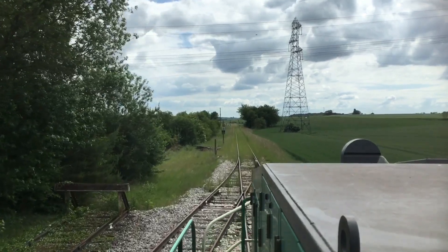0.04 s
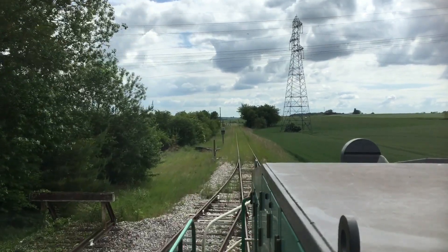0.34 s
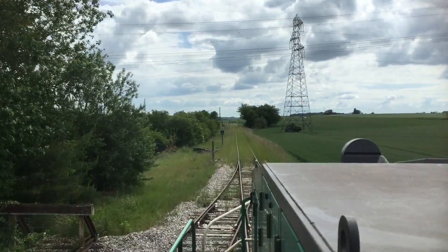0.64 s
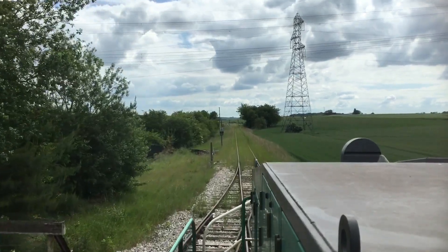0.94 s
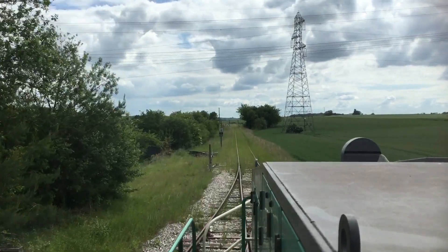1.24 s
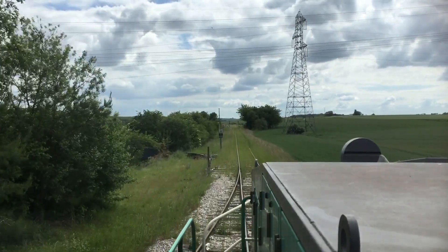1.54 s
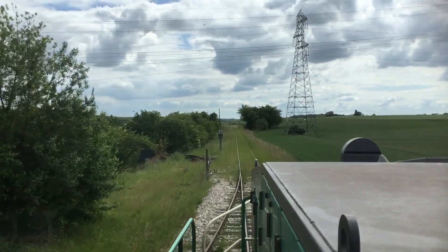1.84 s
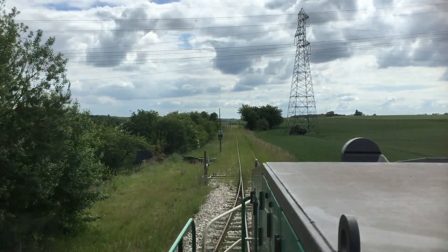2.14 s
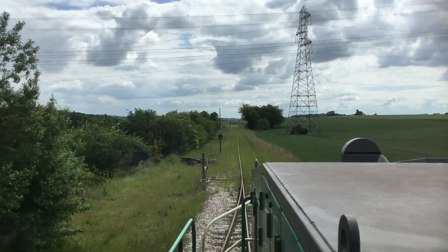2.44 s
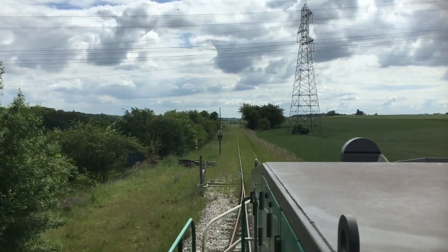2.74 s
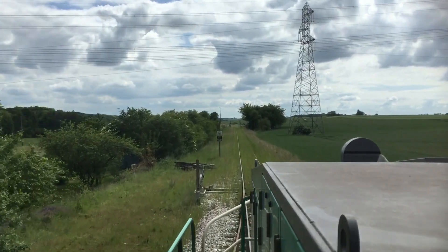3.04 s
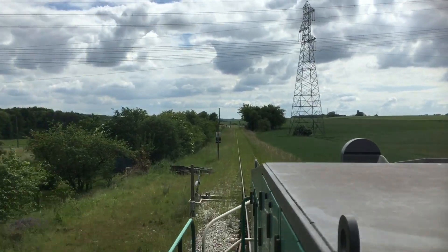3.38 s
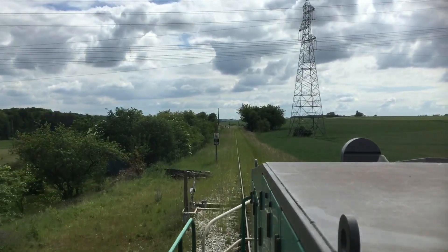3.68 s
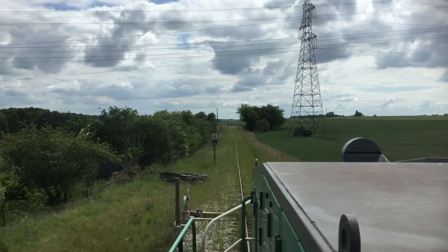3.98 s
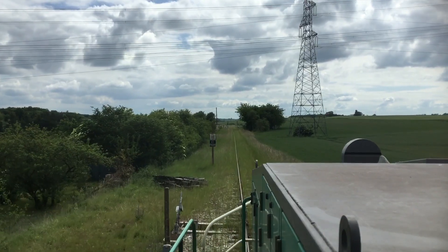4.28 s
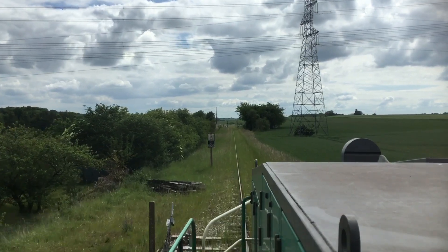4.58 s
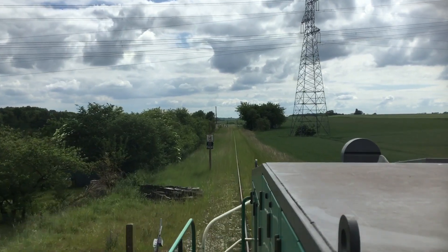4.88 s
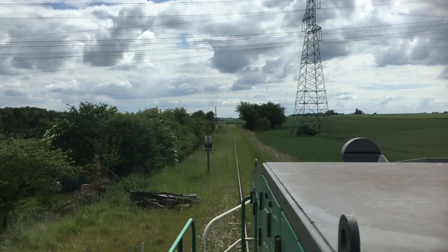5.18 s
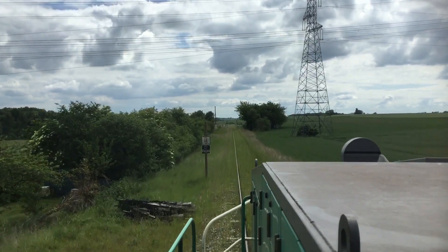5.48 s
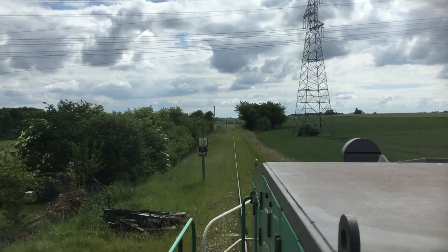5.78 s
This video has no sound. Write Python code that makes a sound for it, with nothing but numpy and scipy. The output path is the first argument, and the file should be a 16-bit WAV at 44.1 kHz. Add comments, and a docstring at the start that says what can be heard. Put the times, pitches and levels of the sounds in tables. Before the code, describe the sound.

A diesel locomotive engine drones low and steady for about six seconds, heard from inside the cab over a deep rumble and faint hiss. It throbs most noticeably in the first second, and a boomy hum swells and fades. Throughout, a loose metal panel rattles in short, bright, irregular clanks, several a second, with a tight echo from the steel walls. A faint wheel squeak comes near 0.9 seconds, and a few more brief, faint squeals between 2.3 and 4.8 seconds. From 2.8 to 3.1 seconds the wheels knock over the track in a cluster of dull, crunchy thumps, with faint gritty scrapes until 3.4 and softer single knocks until 4.2. The clanking thins out around 3.5 seconds, then is strongest from 4.4 to 5.2. From about 5.1 seconds the engine speeds up slightly and grows a little stronger.

```python
"""An eight-cylinder diesel engine drones in the cab of a locomotive pulling slowly away. Its harmonics
add in phase once a cycle, making a throb; two of them boom near air modes of the cab, and near the end
the engine is opened up. Its shaking makes a loose metal panel clank, and the steel walls reflect the crash.
A flange squeals faintly by stick and slip, grit scrapes under the frame and the wheels knock over
the track, all above the rumble of the cab and the hiss of machinery and rails."""
import sys
import numpy as np
from scipy import signal
from scipy.fft import rfft, irfft
from scipy.io import wavfile
from scipy.ndimage import uniform_filter1d

SR = 44100
rng = np.random.default_rng(int(sys.argv[2]) if len(sys.argv) > 2 else 0)


def put_to_file(sound):
    """Save the sound as 16-bit audio at rate SR, in the file named by the first command-line argument."""
    columns = np.atleast_2d(sound).T  # one column per channel
    safe = np.clip(columns, -1, 1)
    whole_steps = np.round(safe * 32767)
    wavfile.write(sys.argv[1], SR, whole_steps.astype(np.int16))


N = 256662
T = np.arange(N) / SR
FREQ = np.maximum(np.arange(N // 2 + 1) * SR / N, 1)
CYLINDERS = 8

# engine speed: (time [s], firing rate [Hz])
FIRING_RATE = [(0, 77.5), (0.3, 77.3), (1.2, 76.85), (2, 76.54), (2.7, 76.46), (3.3, 76.61), (4.2, 76.63),
               (5.1, 76.7), (5.5, 77.6), (5.82, 79.55)]
# engine load, as the strength of the harmonic at the firing rate: (time [s], level [dB])
ENGINE_LOAD = [(0.0, -19), (1.85, -18), (3.58, -18.5), (4.96, -18.5), (5.48, -16), (5.82, -16)]
# harmonics of the drone: (order [multiple of the cycle rate], level [dB])
ENGINE_ORDERS = [(6, -41), (7, -54), (8, -17), (9, -30.5), (10, -29.5), (11, -59), (12, -55), (13, -35),
                 (14, -41.5), (18, -46), (22, -47.5), (29, -47), (37, -56), (54, -60.5), (62, -63)]
# modulation of the drone once a cycle, deepest at the start: (time [s], depth [0-1])
THROB_DEPTH = [(0, 0.13), (.9, .04), (5.82, .02)]
# strength of the order that booms in the cab: (time [s], level [dB])
BOOM_LEVEL = [(0, -37), (.66, -34), (1.5, -34.5), (2.6, -38.5), (2.9, -40.5), (3.55, -32), (4.7, -52),
              (4.96, -29.5), (5.45, -47.5), (5.82, -58)]
# spectrum of the cab's rumble: (frequency [Hz], relative density [dB])
RUMBLE_SPECTRUM = [(20, -23.5), (40, -12), (58, -3.5), (95, -2), (140, 0), (195, 1), (240, -3.5), (285, -6),
                   (350, -9.5), (430, -23.5), (580, -31.5), (1100, -53.5), (2500, -79.5)]
# strength of the rumble: (time [s], level [dB])
RUMBLE_LEVEL = [(0, -34.5), (.7, -30), (1.4, -31), (2.3, -33.5), (2.9, -29), (3.6, -30), (4.4, -30.5),
                (5, -28.5), (5.4, -32.5), (5.82, -35.5)]
# spectrum of the hiss of machinery and rails: (frequency [Hz], relative density [dB])
HISS_SPECTRUM = [(500, -5), (1000, 0.5), (1500, -2), (2500, -6), (4000, -11), (5000, -20), (7000, -24.5),
                 (10000, -35), (15500, -37.5)]
# strength of the hiss: (time [s], level [dB])
HISS_ENVELOPE = [(0, -59), (1, -57.5), (1.95, -60), (2.7, -56.5), (3.3, -56), (3.8, -60), (4.8, -56),
                 (5.82, -58)]
# hard blows of the loose panel: (time [s], relative level [dB])
PANEL_CLANKS = [(0.0703, -40.5), (0.1715, -32.5), (0.2784, -39.5), (0.4191, -32.5), (0.5924, -35.5),
                (0.733, -32), (0.8313, -33), (0.9261, -35), (1.1484, -46.5), (1.2082, -45), (1.2682, -37.5),
                (1.4544, -34), (1.48, -35.5), (1.5541, -32), (1.6546, -33.5), (1.73, -32.5),
                (2.0086, -39.5), (2.0355, -37), (2.1137, -32), (2.2166, -30.5), (2.3044, -35), (2.395, -34),
                (2.4942, -30), (2.5883, -37), (2.7735, -39.5), (2.8788, -35.5), (2.9667, -34.5),
                (3.0624, -35.5), (3.1482, -44.5), (3.1624, -36), (3.2534, -38.5), (3.4477, -38),
                (3.628, -45), (3.7312, -40.5), (3.8287, -42), (4.1064, -40), (4.1279, -34.5),
                (4.2086, -35.5), (4.2717, -36), (4.3378, -38.5), (4.4449, -31.5), (4.5203, -31.5),
                (4.5454, -34), (4.6218, -29), (4.6464, -32.5), (4.7206, -27.5), (4.814, -34),
                (4.8982, -27.5), (4.9985, -28), (5.0749, -33.5), (5.0966, -33), (5.1784, -31),
                (5.2544, -37.5), (5.285, -31), (5.3833, -33.5), (5.4595, -32), (5.5588, -34), (5.7346, -36)]
# main modes of the panel: (frequency [Hz], width [Hz], relative density [dB])
PANEL_MODES = [(1487, 39, 3.5), (1707, 9.4, -0.5), (1860, 23, -25), (2325, 61, 3.5), (2730, 23, -4.5),
               (2830, 12, -1.5), (3480, 18, -18.5), (3430, 58, -3.5), (3735, 110, -4.5), (3870, 10, -1.5),
               (4365, 12, -4), (4356, 21, -20), (4770, 12, -14.5), (5530, 12, -8.5), (5420, 27, -3),
               (5800, 30, -1), (6183, 65, 2), (6640, 49, -28.5), (7150, 83, -11), (7880, 25, -2.5),
               (8400, 37, -17.5), (9020, 22, -13.5), (9330, 60, -17.5), (10670, 39, -19)]
# crash of the panel's many weak modes: (frequency [Hz], relative density [dB])
CRASH_SPECTRUM = [(700, -28.5), (1300, -5.5), (1550, -9.5), (2600, 1.5), (3100, -1.5), (4000, 1.5),
                  (6100, -3), (6700, -6), (8200, -9), (10000, -27), (11000, -21.5), (13300, -24.5)]
# flange rubbing on the rail:
# (time [s], length [s], start pitch [Hz], end pitch [Hz], level [dB], roughness [1 or more is all noise])
FLANGE_SQUEALS = [(0.891, 0.059, 555, 532, -40, .3), (2.349, 0.26, 4180, 4040, -54.5, 0.95),
                  (2.98, 0.099, 2150, 1880, -55, 0.8), (3.207, 0.076, 654, 510, -35, 0.2),
                  (3.283, 0.13, 2450, 2770, -55.5, 0.9), (3.495, 0.28, 4300, 3930, -57.5, 1.1),
                  (4.561, 0.21, 4400, 4120, -53, 0.9)]
# gritty scrapes under the frame: (peak time [s], half width [s], level [dB])
FRAME_SCRAPES = [(1.04, 0.046, -64.5), (2.9, 0.06, -55), (3.04, 0.042, -54.5), (3.2, 0.042, -55.5),
                 (3.38, 0.046, -56.5)]
# knocks of wheels and frame: (time [s], length [s], boom level [dB], pitch [Hz], crunch level [dB])
WHEEL_KNOCKS = [(2.821, 0.065, -16.5, 274.6, -34), (2.876, 0.033, -22, 285, -42),
                (2.972, 0.051, -32.5, 337, -31), (3.025, 0.012, -17.5, 284, -31),
                (3.026, .036, -39.5, 705, -27.5), (3.395, 0.06, -28.5, 276.6, -39),
                (3.691, 0.042, -26, 285, -40), (4.045, 0.034, -24, 278, -35.5),
                (4.165, 0.042, -27, 278, -55), (5.562, 0.0072, -41, 1130, -29)]


def undb(db):
    """Decibels to amplitude gain."""
    return 10 ** (np.asarray(db) / 20)


def unit(x):
    """Scale to rms 1."""
    return x / np.sqrt(np.mean(x ** 2))


def curve(rows):
    """Linear interpolation of (time [s], value) rows at every sample."""
    return np.interp(T, *np.transpose(rows))


def noise(gain):
    """Gaussian noise of rms 1, shaped by a gain at each frequency."""
    return unit(irfft(rfft(rng.standard_normal(N)) * gain, N))


def coloured_noise(spectrum):
    """Noise of rms 1 shaped by (frequency [Hz], density [dB]) rows, falling away below the first."""
    hz, db = np.transpose(spectrum)
    low_cut = np.minimum(FREQ / hz[0], 1) ** 2
    return noise(undb(np.interp(np.log(FREQ), np.log(hz), db)) * low_cut)


def waver(rate_hz):
    """Smooth random fluctuation of rms 1 and bandwidth rate_hz."""
    return noise(np.exp(-.5 * (FREQ / rate_hz) ** 2))


def decay(t, t60, rise_s):
    """Envelope of a damped vibration: a quick rise, then a fall of 60 dB in t60 seconds."""
    return (1 - np.exp(-t / rise_s)) * np.exp(-np.log(1000) * t / t60)


def add(out, start_s, x):
    """Superpose x on out from start_s on."""
    i = max(int(start_s * SR), 0)
    out[i:i + len(x)] += x[:N - i]


def engine_drone(cycle, dispersion_rad=.02, blur_rad=0.028, throb_lag_cycles=0.14):
    """Superposition: the engine's harmonics align at the strongest firing of each cycle, making a throb."""
    out = np.zeros(N)
    load_db = curve(ENGINE_LOAD) - max(db for _, db in ENGINE_ORDERS)
    for order, db in ENGINE_ORDERS:
        # orders near the firing rate are firm and follow the load; those further off waver
        apart = abs(order - CYLINDERS)
        level_db = db + (load_db if apart <= 2 else 0)
        spread_db = np.interp(apart, [0, 1, 10], [0.56, 1, 4.5])
        # dispersion through pipe and cab delays the upper orders more, which rounds the pulse
        phase = 2 * np.pi * order * cycle - dispersion_rad * apart ** 2 + blur_rad * apart * waver(2)
        out += undb(level_db + spread_db * waver(3.77)) * np.cos(phase)
    throb = 1 + curve(THROB_DEPTH) * np.cos(2 * np.pi * (cycle - throb_lag_cycles))
    return np.sqrt(2) * out * throb


def cab_resonance(cycle, boom_order=21, hum_order=36, mode_hz=360.4, mode_width_hz=9.2, waver_db=3):
    """Forced resonance: two engine orders fall near air modes of the cab, and swell and fade there."""
    boom_gain = undb(curve(BOOM_LEVEL) + waver_db * waver(3))
    boom = boom_gain * np.cos(2 * np.pi * boom_order * cycle + 1.05 * waver(3))
    # the higher order lies just under its mode, so it swells as the engine speeds up
    hum_hz = hum_order * curve(FIRING_RATE) / CYLINDERS
    detuning = (hum_hz - mode_hz) / (mode_width_hz / 2)
    hum_gain = undb(-35 + waver_db * waver(3)) / np.hypot(1, detuning)
    hum = hum_gain * np.cos(2 * np.pi * hum_order * cycle + 0.66 * waver(0.73))
    return np.sqrt(2) * (boom + hum)


def cab_noise(cycle):
    """Amplitude modulation: rumble swells each cycle and hiss each firing, over dull machinery roar."""
    rumble = coloured_noise(RUMBLE_SPECTRUM) * (1 + 0.026 * np.cos(2 * np.pi * cycle))
    roar = coloured_noise([(420, 1), (570, 0), (700, -4), (850, -9), (1100, -19), (2500, -48)])
    roar *= undb(-49 + 1.3 * waver(6.6))
    hiss = coloured_noise(HISS_SPECTRUM) * (1 + 0.098 * np.cos(2 * np.pi * CYLINDERS * cycle))
    hiss *= undb(curve(HISS_ENVELOPE) + 1.4 * waver(7))
    return rumble * undb(curve(RUMBLE_LEVEL)) + roar + hiss


def panel_blows(pause_s=.15, tap_db=-9, rebound_db=-11, scatter_db=3):
    """Inelastic impacts: clanks and taps, each with a weaker rebound, as (time [s], level [dB]) rows."""
    times, db = np.transpose(PANEL_CLANKS)
    # when a pause follows a clank, the panel taps again one engine cycle after it
    paused = np.diff(times, append=T[-1]) > pause_s
    cycle_s = CYLINDERS / np.interp(times, *np.transpose(FIRING_RATE))
    times = np.r_[times, (times + cycle_s)[paused]]
    db = np.r_[db, db[paused] + tap_db]
    lateness, strength = rng.random((len(times), 2)).T
    rebound_times = times + 0.014 + 0.02 * lateness
    rebound_levels = db + rebound_db + scatter_db * (2 * strength - 1)
    return np.r_[np.c_[times, db], np.c_[rebound_times, rebound_levels]]


def loose_panel(ring_db=-3, crash_db=-5, scatter_db=2.5, crash_t60=0.079, rise_s=0.0035):
    """Modal vibration: struck at one spot, the main modes ring in beating pairs and the weak ones crash."""
    ring, crash = np.zeros(N), np.zeros(N)
    t = T[:SR // 4]
    hz, width_hz, db = np.transpose(PANEL_MODES)[:, :, None]
    phase = 2 * np.pi * (hz * t + rng.random(hz.shape))
    beat_phase = np.pi * .55 * width_hz * t
    mode_t60 = np.interp(hz, [1500, 8000], [0.1, 0.053])
    modes = (np.sin(phase - beat_phase) + 0.79 * np.sin(phase + beat_phase)) * decay(t, mode_t60, rise_s)
    weights = (undb(db) * np.sqrt(width_hz))[:, 0]
    weights /= np.sqrt(np.sum(weights ** 2) / 2)
    weak_modes = coloured_noise(CRASH_SPECTRUM)
    for time_s, blow_db in panel_blows():
        start_s = time_s - rise_s / 2
        excitation = weights * undb(scatter_db * rng.standard_normal(len(weights)))
        add(ring, start_s, undb(blow_db + ring_db) * excitation @ modes)
        # chatter at the contact makes each crash a little different
        chatter = 0.97 * np.roll(weak_modes, rng.integers(N))[:len(t)]
        burst = (weak_modes[:len(t)] + chatter) * decay(t, crash_t60, rise_s)
        add(crash, start_s, undb(blow_db + crash_db) * burst)
    # harder blows have a shorter contact, and so a brighter crash
    force = np.sqrt(uniform_filter1d(crash ** 2, SR // 100).clip(0))
    treble = signal.sosfilt(signal.butter(2, 9000, "high", fs=SR, output="sos"), crash)
    return ring + wall_reflections(crash + 1.4 * treble * force / force.max())


def wall_reflections(x, wet_db=-2, low_t60=0.13, high_t60=0.094, build_s=0.0026, split_hz=5000):
    """Reverberation: dense reflections between the cab's steel walls and windows; the treble dies first."""
    t = T[:SR // 3]
    low = noise(1 / (1 + (FREQ / split_hz) ** 4))[:len(t)] * decay(t, low_t60, build_s)
    high = noise(1 / (1 + (split_hz / FREQ) ** 4))[:len(t)] * decay(t, high_t60, build_s)
    tail = low + 0.51 * high
    tail /= np.sqrt(np.sum(tail ** 2))
    return x + undb(wet_db) * signal.fftconvolve(x, tail)[:N]


def flange_squeals(relative_bandwidth=0.03):
    """Stick-slip friction of wheel on rail: short gliding tones, smeared into narrow hiss when rough."""
    out = np.zeros(N)
    for start_s, length_s, start_hz, end_hz, db, roughness in FLANGE_SQUEALS:
        t = T[:int(length_s * SR)]
        phase = 2 * np.pi * np.cumsum(np.linspace(start_hz, end_hz, len(t))) / SR
        slip = waver(relative_bandwidth * start_hz)
        jitter = slip[:len(t)] + 1j * slip[-2 * len(t):-len(t)]  # random in amplitude and phase
        noise_share = min(roughness, 1)
        grip = np.sqrt(1 - noise_share) + np.sqrt(noise_share / 2) * jitter
        tone = (grip * np.exp(1j * phase)).imag
        add(out, start_s, undb(db) * np.sin(np.pi * t / length_s) * tone)
    return out


def frame_scrapes(grain_rate_hz=90):
    """Friction noise: grainy scrapes swell and die away under the frame, mostly while the wheels knock."""
    grains = unit(undb(-waver(grain_rate_hz)))
    scrape = coloured_noise([(1200, 5), (2500, 0.5), (4200, 1), (6000, -7), (9000, -18), (14000, -20)])
    swells = sum(undb(db) * np.exp(-((T - peak_s) / width_s) ** 2) for peak_s, width_s, db in FRAME_SCRAPES)
    return scrape * grains * swells


def wheel_knocks():
    """Structure-borne sound: a wheel's blow comes through the springs as a soft boom and a dull crunch."""
    booms, crunch_gain = np.zeros(N), np.zeros(N)
    for start_s, length_s, boom_db, hz, crunch_db in WHEEL_KNOCKS:
        t = T[:int(length_s * SR)]
        swell = np.sin(np.pi * t / length_s)
        add(booms, start_s, undb(boom_db) * swell ** 2 * np.sin(2 * np.pi * hz * t))
        add(crunch_gain, start_s, undb(crunch_db) * swell)
    crunch = coloured_noise([(180, 12), (400, 3.5), (730, -6), (950, -20.5), (2000, -21.5),
                             (5000, -36), (12000, -51.5)])
    return booms + crunch_gain * crunch


def scene(strong_firing_s=.0445):
    """Superposition of all sources in the cab; in one engine cycle every cylinder fires once."""
    cycle = np.cumsum(curve(FIRING_RATE)) / SR / CYLINDERS
    cycle -= np.interp(strong_firing_s, T, cycle)  # count cycles from a strong firing
    engine_and_cab = engine_drone(cycle) + cab_resonance(cycle) + cab_noise(cycle)
    clanks = undb(-5.5) * loose_panel()
    running_gear = wheel_knocks() + flange_squeals() + frame_scrapes()
    return (engine_and_cab + clanks + running_gear)[None]


def record(dry, cutoff_hz=15800):
    """Band limiting: a steep low-pass filter removes the highest treble."""
    return signal.sosfilt(signal.ellip(8, .2, 70, cutoff_hz, fs=SR, output="sos"), dry)


dry = scene()
out = record(dry)
put_to_file(out)
```